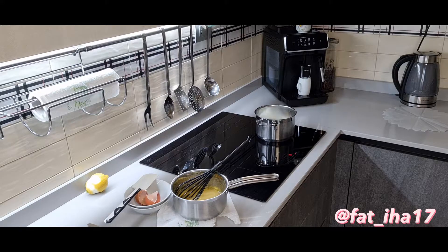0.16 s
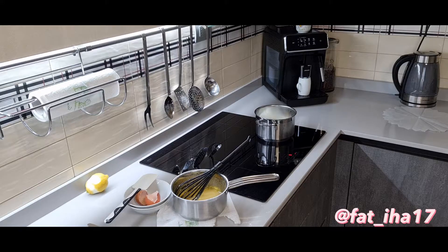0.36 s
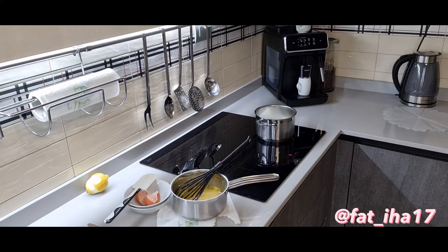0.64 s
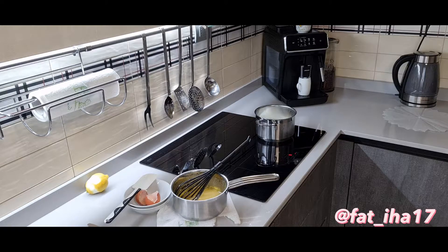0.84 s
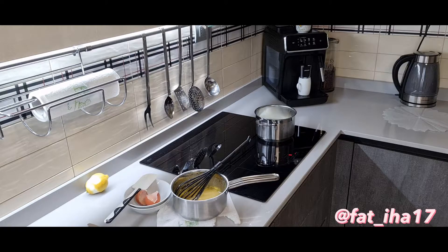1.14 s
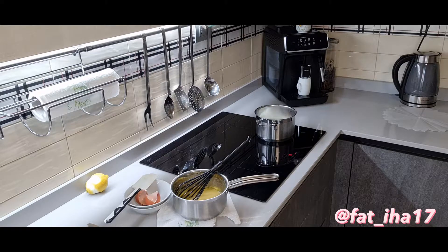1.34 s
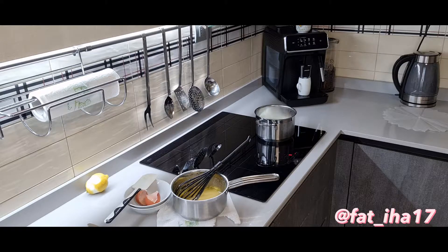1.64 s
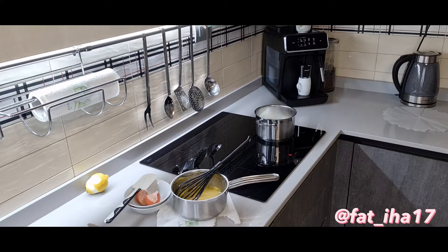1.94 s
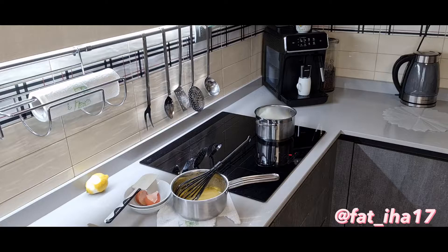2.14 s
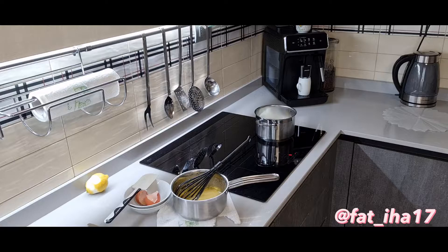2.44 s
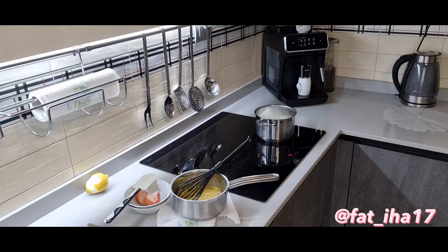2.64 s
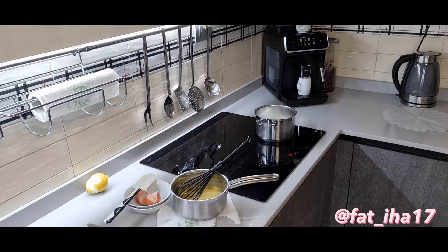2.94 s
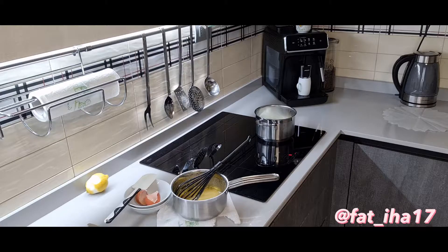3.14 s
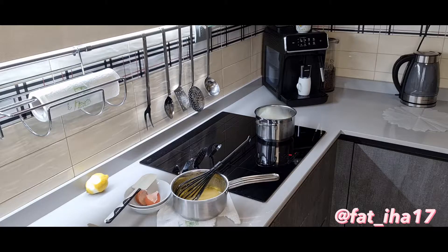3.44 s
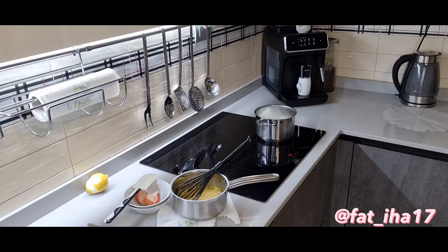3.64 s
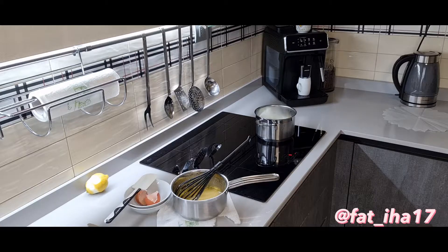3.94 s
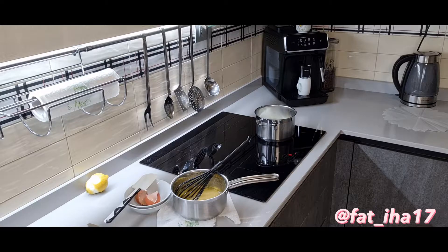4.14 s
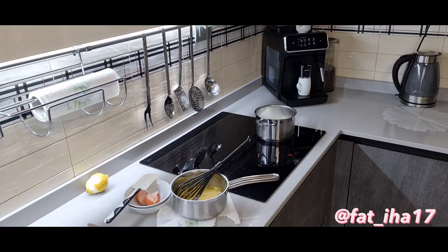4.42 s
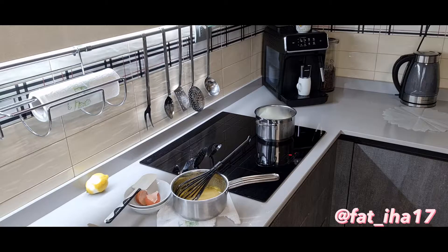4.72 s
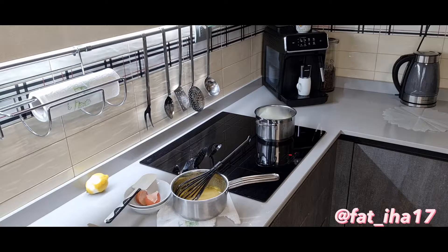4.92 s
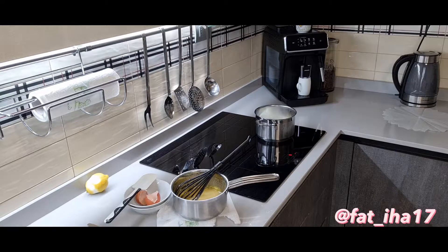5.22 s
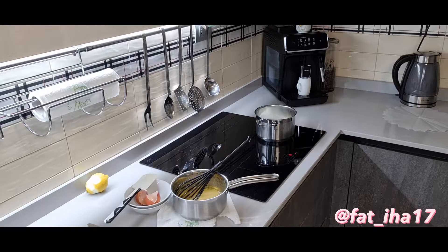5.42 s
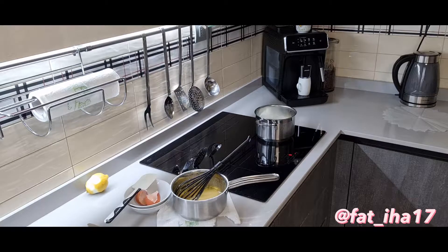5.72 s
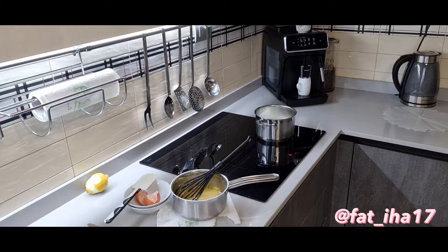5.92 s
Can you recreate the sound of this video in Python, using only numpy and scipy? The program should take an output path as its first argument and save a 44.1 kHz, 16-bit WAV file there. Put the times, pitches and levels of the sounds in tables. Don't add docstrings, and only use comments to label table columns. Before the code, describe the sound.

Someone moves unseen around a kitchen: quiet slipper rubs, cloth movement and tiny clicks over low appliance hum with a very thin high whine. A rough quick scrape stops with a muted knock, then two loud, woody cupboard door slams come close together with low panel boom and short room echo. Things calm down to faint rustle, before light hard objects tick and clink nearby. Wide stereo pickup at room distance.

```python
import sys
import numpy as np
from scipy import signal
from scipy.fft import rfft, irfft
from scipy.io import wavfile
from scipy.ndimage import uniform_filter1d

SR = 44100
rng = np.random.default_rng(int(sys.argv[2]) if len(sys.argv) > 2 else 0)


def int16_out(signal):
    q = np.round(np.clip(np.atleast_2d(signal).T, -1, 1) * 32767)
    wavfile.write(sys.argv[1], SR, q.astype(np.int16))


def undo_db(level):
    steps = np.asarray(level, float) / 20
    return 10 ** steps


N = 267876


def evened(x):
    return x / np.sqrt(np.mean(x ** 2) + 1e-20)


def read(points, hz):
    f, value = np.transpose(points)
    return np.interp(np.log(hz + 1), np.log(f + 1), value)


def add(mix, start_s, sound):
    part = mix[..., round(start_s * SR):][..., :sound.shape[-1]]
    part += sound[..., :part.shape[-1]]


def coloured(x, tone):
    level_db = read(tone, abs(np.fft.fftfreq(4096, 1 / SR)))
    log_gain = np.log(undo_db(np.maximum(level_db, -100)))
    taps = np.fft.ifft(np.exp(np.conj(signal.hilbert(log_gain)))).real[:3072]
    return evened(signal.oaconvolve(x, taps)[:len(x)])


def grit(count, per_s, spread_db):
    chance, size, sign = rng.random((count, 3)).T
    clicks = undo_db(-spread_db * np.log(size + 0.0067)) * np.sign(sign - 0.5)
    return (chance < per_s / SR) * clicks


def burst(shape, per_s, spread_db):
    z = rfft(np.pad(grit(len(shape), per_s, spread_db) * shape, (128, 3072)))
    smooth = uniform_filter1d(abs(z) ** 2, size=len(z) // 90)
    return irfft(z / np.sqrt(smooth + 1e-12))


def stroke(rows, x, rise_db_s, fall_db_s):
    full_s, held_s, level_db = np.transpose(rows)[:, :, None]
    t = np.arange(N) / SR
    rise_db = rise_db_s * np.maximum(full_s - t, 0)
    fall_db = fall_db_s * np.maximum(t - full_s - held_s, 0)
    return x * undo_db((level_db - rise_db - fall_db).max(0))


def wander(hz):
    t = np.arange(0, N + 256, 256) / SR
    slow = sum(np.sin(2 * np.pi * (f * t + rng.random())) / np.sqrt(f)
               for f in np.geomspace(hz / 20, hz, num=20))
    return np.interp(np.arange(N) / SR, t, evened(slow))


# pitch_hz, correlation
LIKENESS = [(40, 0.83), (70, 0.69), (130, 0.93), (290, 0.8), (640, 0.45), (1410, -0.16), (3100, 0.01),
            (15000, -0.056)]


def spread(a, b):
    same = np.clip(read(LIKENESS, np.fft.rfftfreq(len(a), 1 / SR)), -1, 1)
    near = np.sqrt((1 + same) / 2) * rfft(a)
    apart = np.sqrt((1 - same) / 2) * rfft(b)
    return irfft(np.array([near + apart, near - apart]), len(a))


# multiple, level_db
HUM_PARTIALS = [(1, -59.5), (2, -82), (3, -60), (4, -70.5)]
# pitch_hz, width_hz, level_db
FAN_LINES = [(269, 2.6, -69.5), (580, 0.66, -70), (774, 7.4, -72), (1240, 24, -78.5), (4650, 5.5, -91),
             (14120, 65, -94), (15100, 160, -80), (14900, 570, -75.5)]
# pitch_hz, density_db_per_hz
FAN_TONE = [(12, -60), (30, -31), (50, -9), (70, -5.5), (130, -13), (250, -10), (400, -12.5), (780, -18),
            (1030, -28), (3050, -30.5), (6000, -43), (11000, -50.5), (14300, -37), (15900, -38)]


def appliances():
    mains_hz = 99.83 * (1 + 0.00207 * wander(0.895))
    turns = np.cumsum(mains_hz) / SR
    hum = np.zeros(N)
    for k, db in HUM_PARTIALS:
        level = undo_db(db + 0.86 * wander(8.2)) * np.sqrt(2)
        hum += level * np.sin(2 * np.pi * (k * turns + rng.random()))
    hz = np.fft.rfftfreq(N, 1 / SR)
    lines = sum(undo_db(db) * np.sqrt(SR / np.pi / width_hz) / (1 + (2 * (hz - f) / width_hz) ** 2)
                for f, width_hz, db in FAN_LINES)
    whine = spread(*irfft(lines * rfft(rng.standard_normal((2, N))), N))
    air = spread(*[coloured(v, FAN_TONE) for v in rng.standard_normal((2, N))])
    return hum + whine + air * undo_db(-60 + 1.5 * wander(4.3))


# pitch_hz, t60_s
KITCHEN_DECAY = [(60, 0.77), (250, 0.57), (700, 0.69), (2000, 0.66), (4000, 0.64), (7700, 0.5),
                 (11000, 0.33), (16000, 0.31)]


def echoes():
    taps = np.zeros((2, SR))
    at = np.arange(0, SR - 16, 16) + rng.integers(0, 16, (2, (SR - 1) // 16))
    np.put_along_axis(taps, at, rng.choice([-1., 1.], at.shape), 1)
    hz, t, z = signal.stft(taps, SR, nperseg=256)
    decay = undo_db(-60 * t / read(KITCHEN_DECAY, hz)[:, None])
    tail = signal.istft(z * decay, SR, nperseg=256)[1][:, :SR]
    t = np.arange(SR) / SR
    early = 1 + 0.39 * undo_db(-60 * t / 0.037)
    tail = spread(*tail) * np.minimum(0.9 + t / 0.011, 1) * early
    return tail / np.linalg.norm(tail[0])


def kitchen(x):
    turn = 2 * np.pi * 5.0 * np.arange(N) / SR
    share = [np.sqrt(2 / 3) * np.cos(turn + k * np.pi / 3) for k in range(3)]
    return sum(signal.fftconvolve((x * w)[None], echoes(), axes=1)[:, :N] for w in share)


# full_s, held_s, level_db
RUSTLE = [(0.01, 0.64, -72), (.75, .05, -67.5), (1.37, .03, -57.5), (1.87, 0.06, -59.5), (2.12, .01, -57.5),
          (2.42, 0.025, -64), (2.6, 0.18, -64.5), (2.83, 0.86, -60), (3.5, 0.072, -48), (3.9, 0.31, -69),
          (4.82, 1.1, -62)]
# pitch_hz, density_db_per_hz
RUSTLE_TONE = [(530, -42), (900, -7.5), (1530, -2.5), (2010, -3.5), (2650, -6), (7270, -14), (15900, -22)]


def rustle():
    cloth = coloured(grit(N, 5000, 4.5), RUSTLE_TONE) * undo_db(-3.5)
    return stroke(RUSTLE, cloth, rise_db_s=75, fall_db_s=70)


def scuff(start_s, level_db, low_db, treble_db, length_s, ring_hz, skirt_db):
    count = round(np.clip(length_s, 0.002, 0.3) * SR)
    tone = [(150, low_db - 5.5), (600, low_db + 7),
            (ring_hz * 0.54, skirt_db), (ring_hz, 0), (ring_hz * 1.44, skirt_db),
            (7500, treble_db - 4.5), (15900, treble_db - 8.0)]
    u = np.arange(count) / count
    rub = burst(np.minimum(u / 0.039, 1) * np.sqrt(1 - u), 9000, 1.3)
    energy = np.sqrt(0.028 * SR / len(rub) + count / len(rub))
    return start_s - 0.005, undo_db(level_db - 5.5) * energy * coloured(rub, tone)


# start_s, level_db, low_db, treble_db, length_s
SCUFFS = [(0.599, -60.5, -3, -10.5, 0.065), (0.673, -56, -8, -11, 0.087), (1.021, -51, 6.5, -6, 0.11),
          (1.4934, -53.5, -11, -8, 0.03), (1.8148, -55, -6, -8.5, 0.017), (3.052, -47, -5.5, -24, 0.039),
          (4.1255, -70, -11, -7, 0.076), (4.27, -68, -11, 6, 0.025), (4.591, -63, -7, 0, 0.14),
          (4.6563, -57, -6, -8.5, 0.075), (5.7677, -54, -2, -10.5, 0.045)]
# start_s, level_db, low_db, treble_db, length_s
SLIDES = [(1.0705, -54, -22, -4, 0.048), (1.349, -47, -5.5, -6.5, 0.029), (1.945, -54.5, -23, -4, 0.19),
          (2.976, -47, 3.5, -15, 0.022), (3.4053, -42, -3.5, -4.5, 0.046)]


def rubs(dry):
    for rows, ring_hz in ((SCUFFS, 1980), (SLIDES, 3000)):
        for row in rows:
            add(dry, *scuff(*row, ring_hz, skirt_db=-4.5))


# start_s, level_db, low_db, treble_db, ring_hz
TICKS = [(1.03, -57, -4, -27, 680), (1.106, -59, -2, -25, 720), (3.054, -47, -8, -27, 1500),
         (1.591, -52, -16, -29, 1390), (1.6108, -55.5, -29, -39, 1400), (1.616, -54.5, -15, -34, 2360),
         (4.892, -51, -10, -15, 1480), (5.0397, -53, -16, -5.5, 2070), (5.1054, -45.5, -20, -5.5, 3520),
         (5.1105, -47, -22, -22, 5170), (5.1181, -45, -5.5, 2, 3460), (5.3044, -51, -15, 2, 2750),
         (5.313, -47.5, -15, -8, 2950), (5.328, -51.5, -21, -13, 3400), (5.386, -49, -16, -9, 3280),
         (5.409, -56.5, -3, 10, 2800), (5.478, -52, -25, -2, 3000), (5.4871, -48.5, -35, -12, 3220),
         (5.4998, -53, -40, -10, 3000), (5.556, -52.5, -32, -4, 3040), (5.6294, -52.5, 0, -8.5, 2970)]


def ticks(dry, near):
    for *row, ring_hz in TICKS:
        start_s, tick = scuff(*row, 0.003, ring_hz, skirt_db=-10)
        add(dry, start_s, tick)
        add(near, start_s, undo_db(-18) * tick)


# start_s, level_db, pitch_hz, length_s
SQUEAKS = [(1.13, -63, 3150, .055), (1.604, -53, 1380, .026), (4.3, -84, 4630, .36),
           (5.104, -51, 3400, .016)]


def squeaks(near):
    for start_s, level_db, pitch_hz, length_s in SQUEAKS:
        t = np.arange(round(length_s * SR)) / SR
        waver = 0.74 * np.sin(2 * np.pi * 40 * t)
        add(near, start_s, undo_db(level_db) * np.hanning(len(t)) * np.sin(2 * np.pi * pitch_hz * t + waver))


# full_s, held_s, level_db
DRAG = [
    (2.146, 0.0055, -27.5),
    (2.16, .045, -32.5),
]
# pitch_hz, density_db_per_hz
DRAG_TONE = [(180, -30), (400, -9.5), (700, -13), (1200, -14), (1800, -6.5), (2500, -3.5), (3100, -1),
             (3900, -10), (5000, -6.5), (6200, -11.5), (9000, -13), (12400, -12), (15900, -20)]


def drag():
    return stroke(DRAG, coloured(grit(N, 6000, 2.9), DRAG_TONE), rise_db_s=1508, fall_db_s=606)


# full_s, held_s, level_db
SWING = [
    (2.85, 0.088, -56.5),
    (3.022, 0.0083, -45),
    (3.135, 0.012, -49.5),
    (3.54, 0.011, -46),
]
# pitch_hz, density_db_per_hz
SWING_TONE = [(30, -38), (60, -30), (100, -1), (140, -3), (220, -11), (400, -31), (1300, -29), (2500, -82)]


def swing():
    rub = coloured(rng.standard_normal(N), SWING_TONE)
    return stroke(SWING, rub, rise_db_s=310, fall_db_s=130)


def crack(start_s, level_db, rattle_s, tone):
    u = np.arange(round(0.12 * SR)) / SR / rattle_s
    chatter = burst(u ** 1.26 * np.exp(-4 * u), 12000, 0.6)
    return start_s - 0.003, undo_db(level_db) * coloured(chatter, tone) * 0.18


def boom(pitch_hz, level_db, held_s, crest_s):
    t = np.arange(round(0.4 * SR)) / SR
    shape = np.minimum(t / crest_s, 1) ** 2.4 * undo_db(-60 * np.maximum(t - held_s, 0) / 0.054)
    return undo_db(level_db) * shape * np.cos(2 * np.pi * pitch_hz * (t - crest_s))


def rings(modes):
    t, out = np.arange(SR) / SR, np.zeros((2, SR))
    for hz, level_db, t60_s in modes:
        start, side, beat = rng.random(3)
        rise_s = 0.063 * t60_s * (0.47 + 0.52 / (1 + hz / 450))
        angle = np.arccos(np.clip(read(LIKENESS, hz), -1, 1))
        apart = 0.54 * side * angle * np.array([[1], [-1]])
        mode = np.sin(2 * np.pi * (hz * t + start) + apart)
        neighbour = 0.35 * np.sin(2 * np.pi * (hz + 8 + 14 * beat) * t - apart)
        shape = undo_db(level_db - 60 * t / t60_s) * (1 - np.exp(-t / rise_s))
        out += shape * 1.76 * (mode + neighbour)
    return out


# start_s, crack_db, rattle_s, boom_db, boom_held_s
BLOWS = [
    (2.238, -39.5, 0.0092, -43.5, 0.037),
    (3.172, -16.5, 0.019, -19, 0.06),
    (3.591, -14, 0.031, -16, 0.064),
]
# pitch_hz, density_db_per_hz
CRACK_TONES = [
    [(40, -24), (166, -2), (700, -17.5), (1200, -12), (2000, -61), (3300, -100)],
    [(40, -46), (100, -8.5), (200, -20), (400, -17), (700, -28), (1100, -29.5), (1600, -32), (2100, -21.5),
     (2600, -26), (3100, -32), (4500, -40.5), (7000, -54), (15900, -64)],
    [(40, -25), (100, -13.5), (260, -18), (430, -14.5), (800, -23), (1050, -27), (1400, -21.5), (1750, -19),
     (2500, -18.5), (3200, -23.5), (5000, -35), (8000, -49.5), (15900, -56)],
]
# pitch_hz, level_db, t60_s
KNOCK_RINGS = [(167, -41.5, 0.4), (244.5, -48.5, 0.38), (1210, -46.5, 0.19)]
FIRST_RINGS = [(69, -27.5, 0.49), (171.3, -24.5, 0.49), (201.6, -27.5, 0.6), (368, -38, 0.64),
               (404, -37, 0.6), (573, -43, 0.34), (795, -45.5, 0.53), (865, -49, 0.35), (1467, -47, 0.46),
               (1820, -45.5, 0.44), (2019, -41, 0.42), (2070, -39, 0.21), (2420, -31, 0.085),
               (2670, -33, 0.081)]
SECOND_RINGS = [(68.3, -27.5, 0.48), (145, -25.5, 0.65), (167.3, -27, 0.48), (240, -33.5, 0.46),
                (365.6, -31, 0.49), (433, -26.5, 0.39), (567, -41, 0.48), (690, -37.5, 0.41),
                (784, -30, 0.15), (1367, -31.5, 0.17), (1724, -31, 0.29), (1750, -34, 0.19),
                (1900, -42, 0.24), (2196, -46, 0.61)]


def blows(dry, near):
    all_rings = (KNOCK_RINGS, FIRST_RINGS, SECOND_RINGS)
    for (start_s, crack_db, rattle_s, boom_db, held_s), tone, modes in zip(BLOWS, CRACK_TONES, all_rings):
        add(dry, *crack(start_s, crack_db, rattle_s, tone))
        crest_s = 0.013 + 0.45 * rattle_s
        add(near, start_s, boom(101.8, boom_db, held_s, crest_s))
        add(near, start_s + 0.004, rings(modes))


def scene():
    near = np.zeros((2, N))
    dry = rustle() + drag() + swing()
    rubs(dry)
    ticks(dry, near)
    squeaks(near)
    blows(dry, near)
    return kitchen(dry) + undo_db(-13) * dry + near + appliances()


def top_cut(x):
    return signal.sosfilt(signal.butter(12, 16020, fs=SR, output="sos"), x)


def record(dry):
    thin = signal.sosfilt(signal.butter(2, 54, "high", fs=SR, output="sos"), dry)
    low_pass = signal.firwin(2047, 15800, window=("kaiser", 9), fs=SR)
    limited = signal.oaconvolve(thin, low_pass[None], "same")
    return top_cut(limited)


dry = scene()
out = record(dry)
int16_out(out)
```